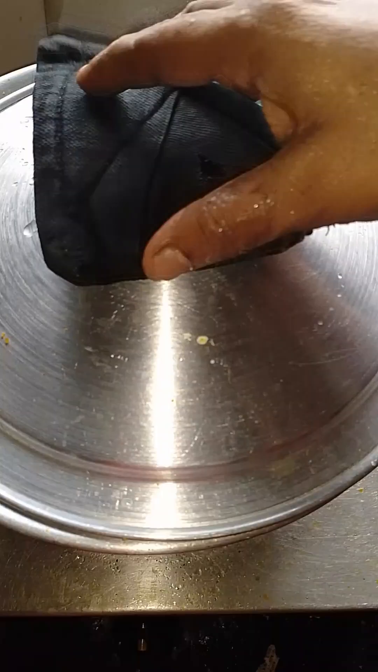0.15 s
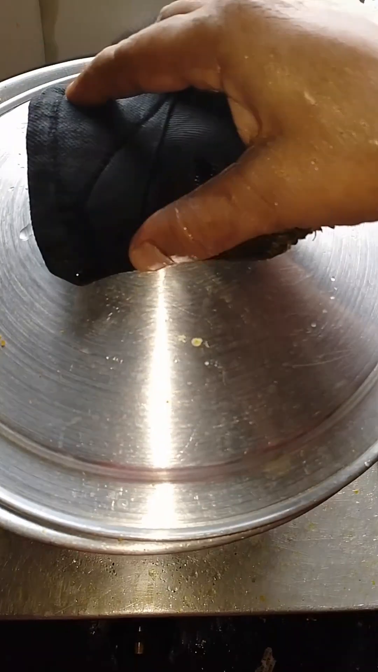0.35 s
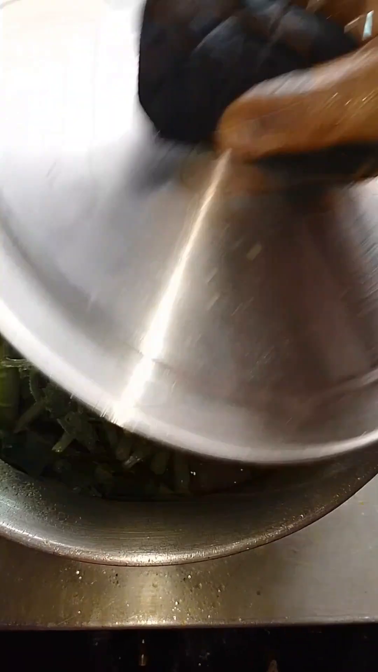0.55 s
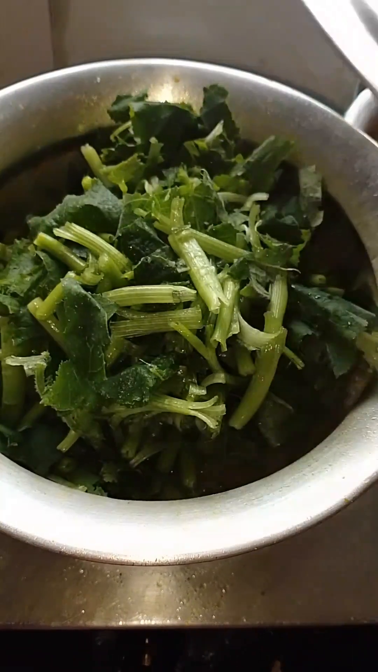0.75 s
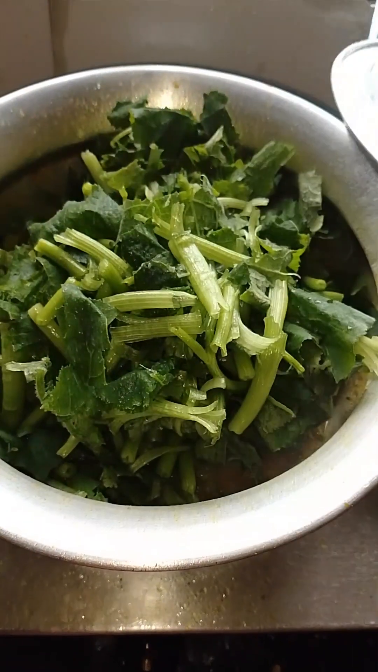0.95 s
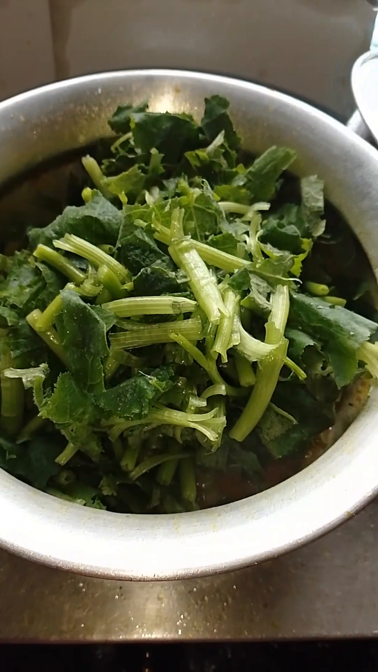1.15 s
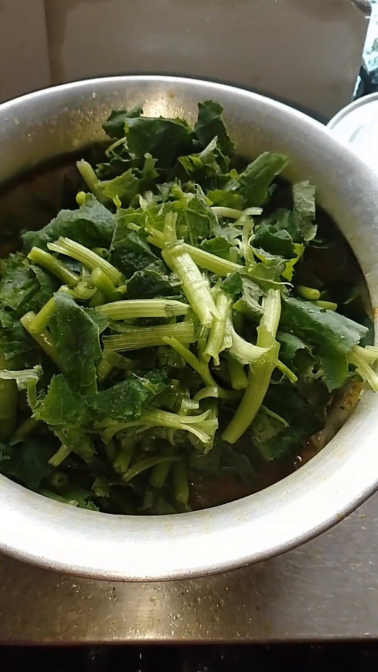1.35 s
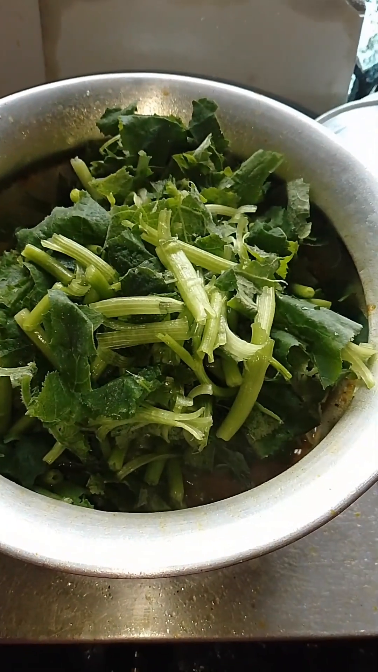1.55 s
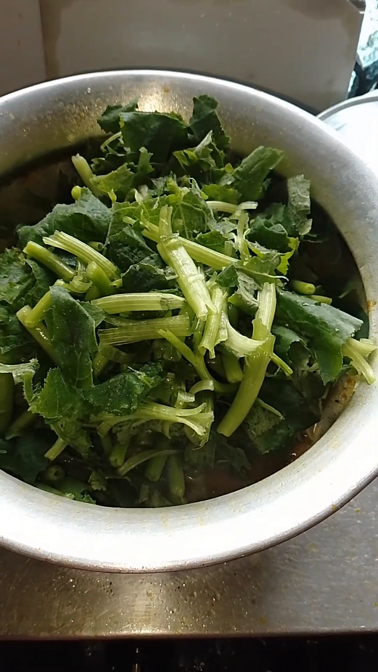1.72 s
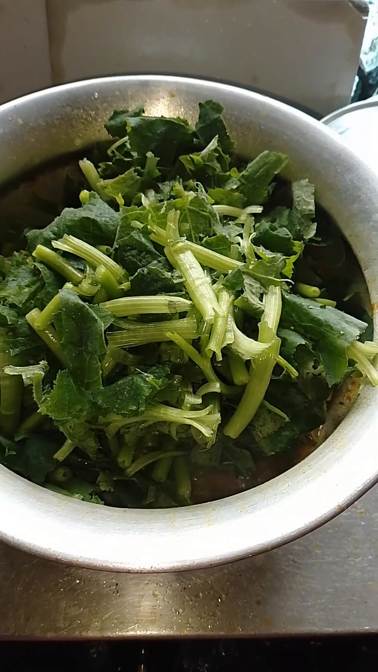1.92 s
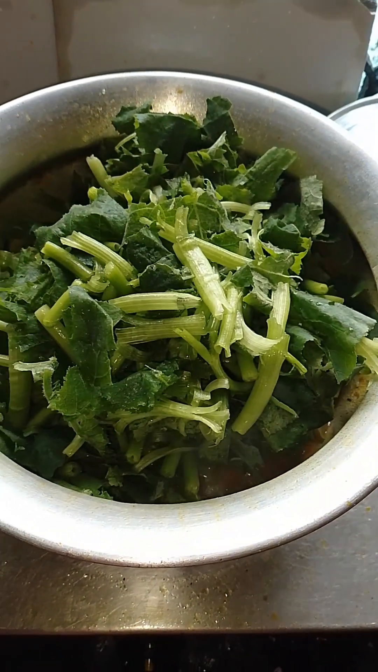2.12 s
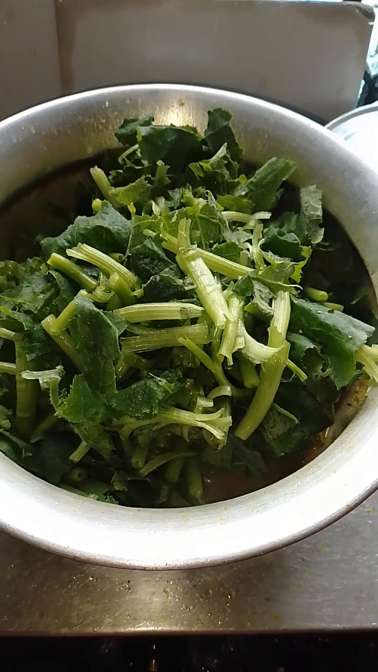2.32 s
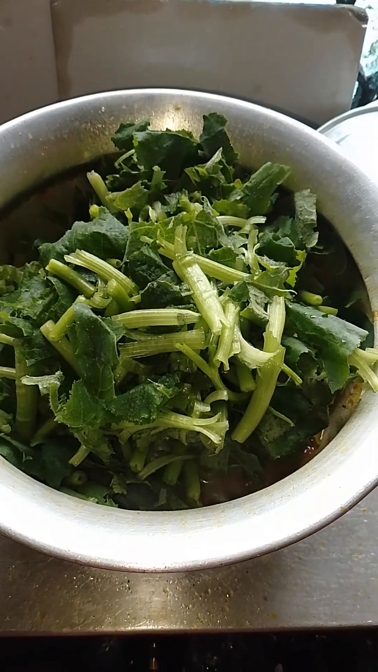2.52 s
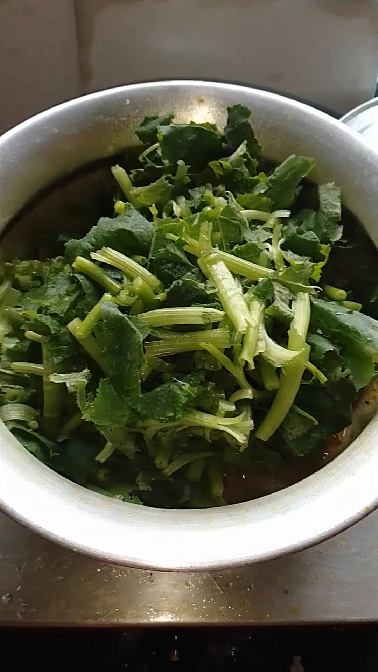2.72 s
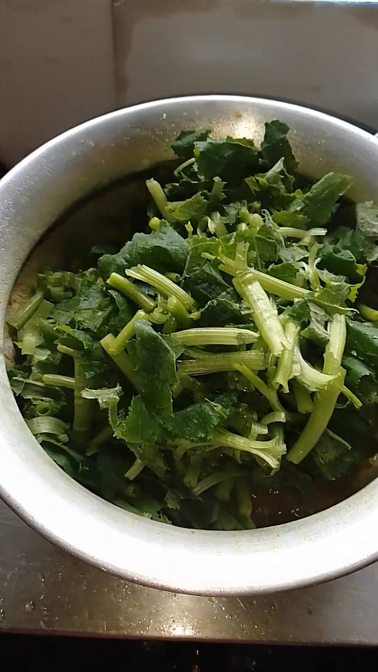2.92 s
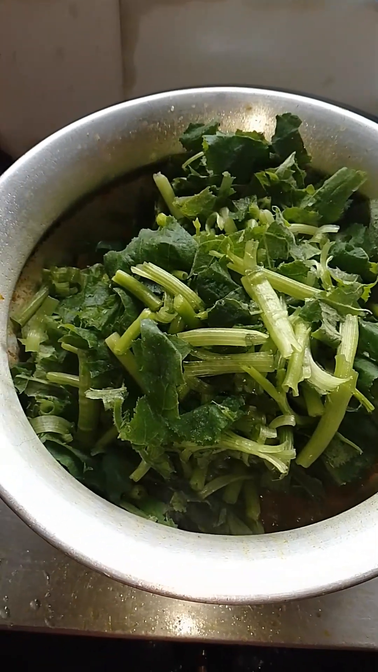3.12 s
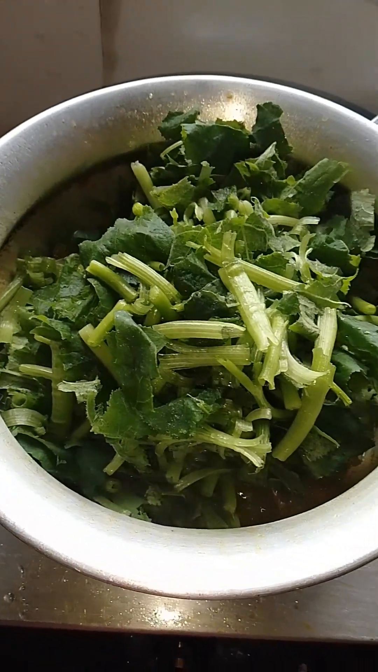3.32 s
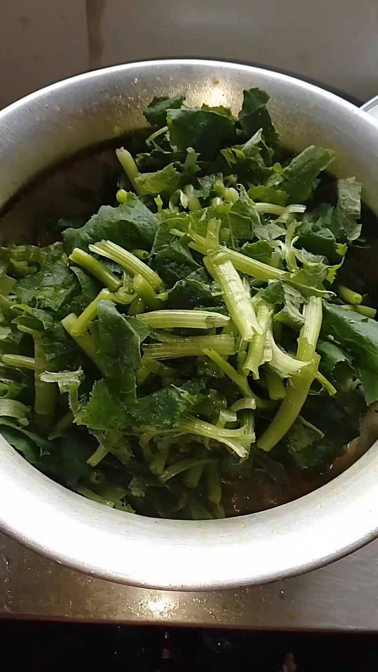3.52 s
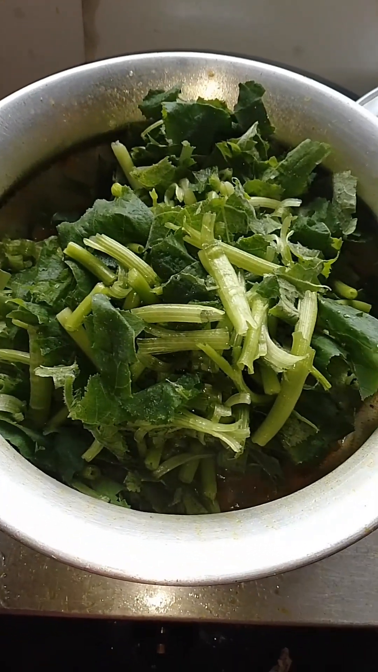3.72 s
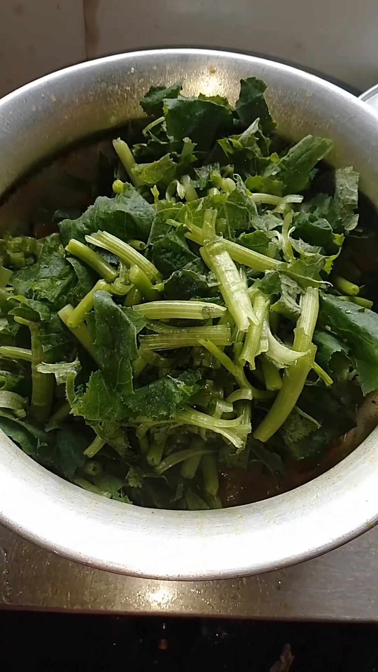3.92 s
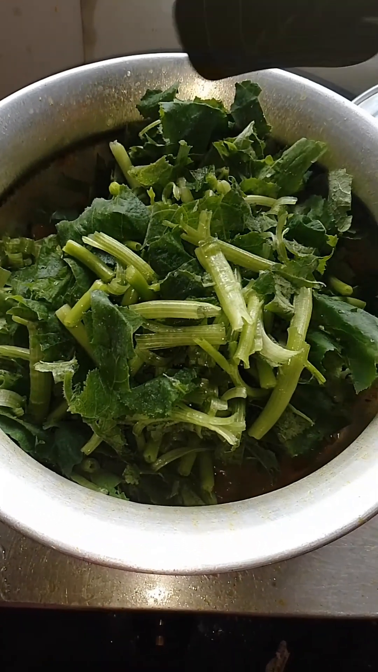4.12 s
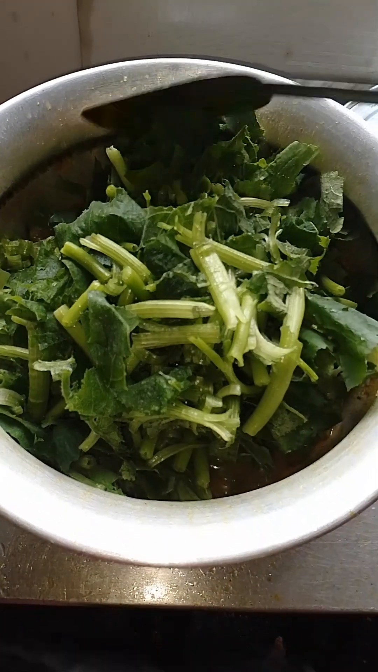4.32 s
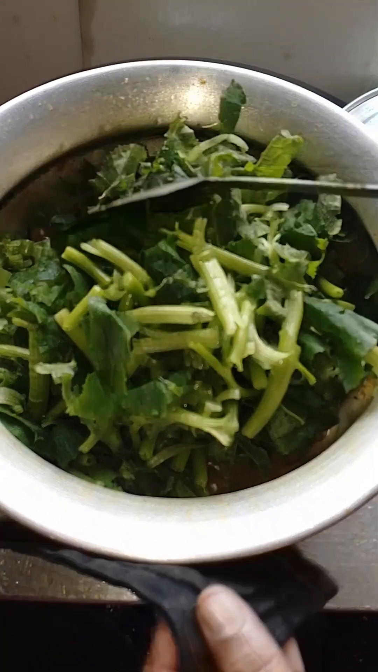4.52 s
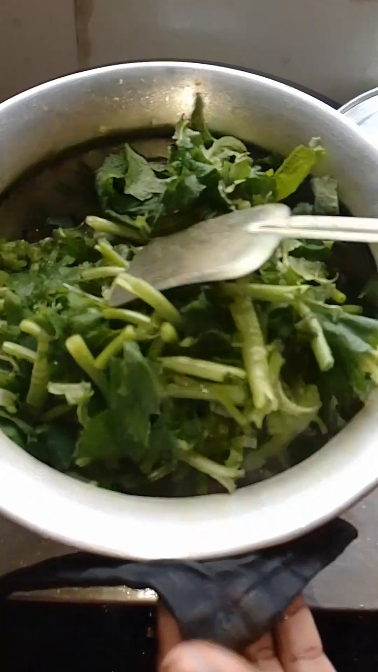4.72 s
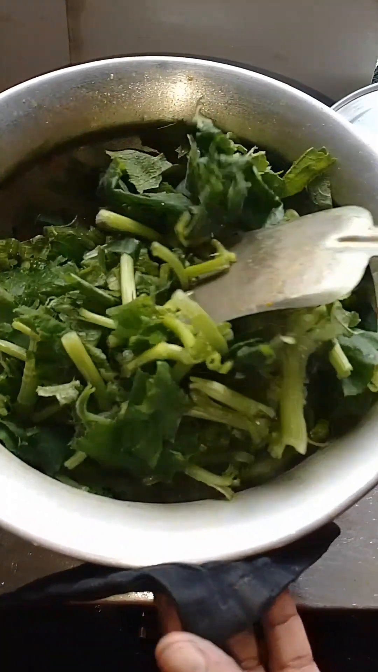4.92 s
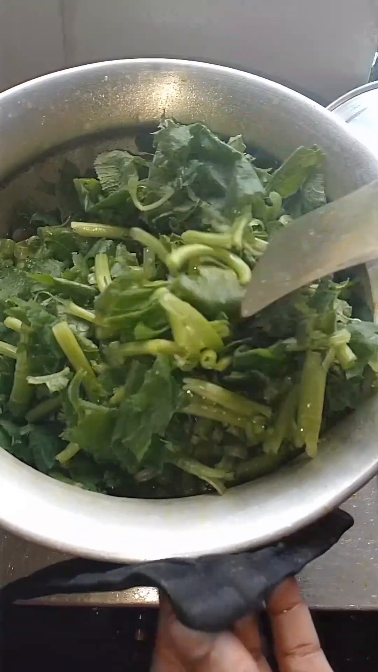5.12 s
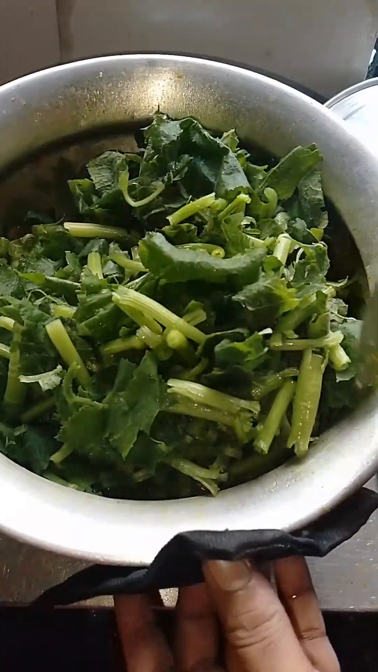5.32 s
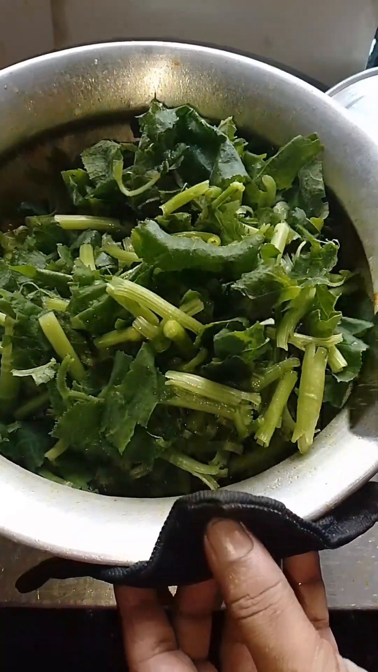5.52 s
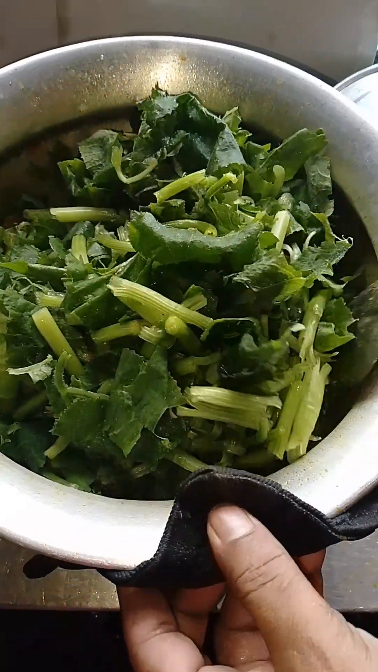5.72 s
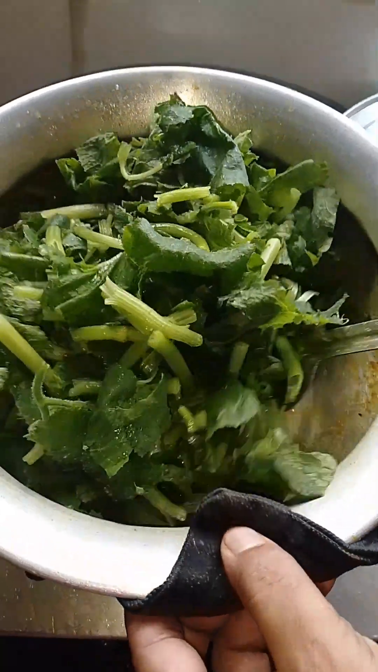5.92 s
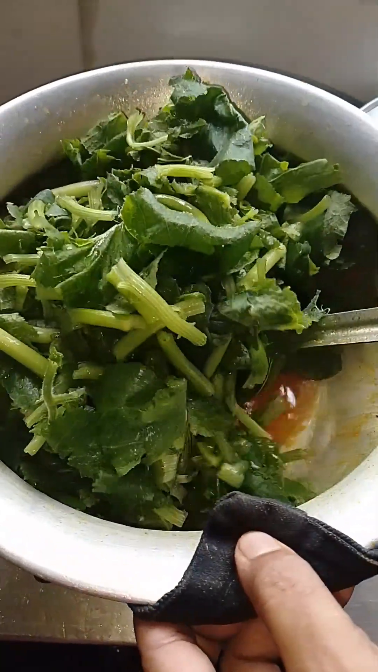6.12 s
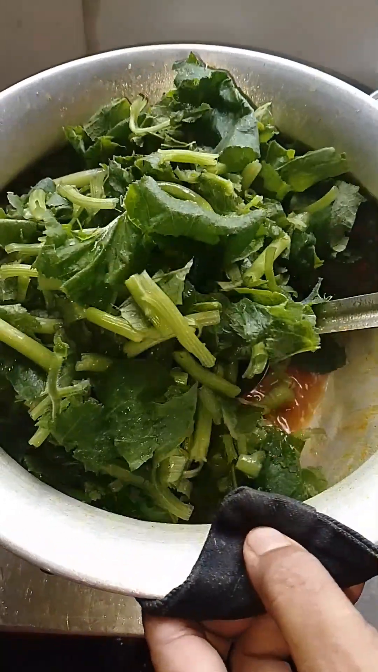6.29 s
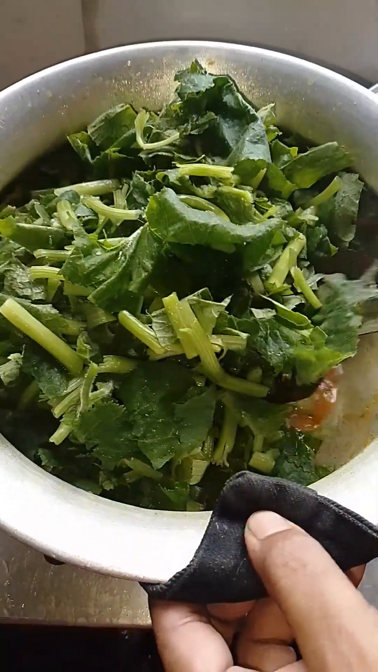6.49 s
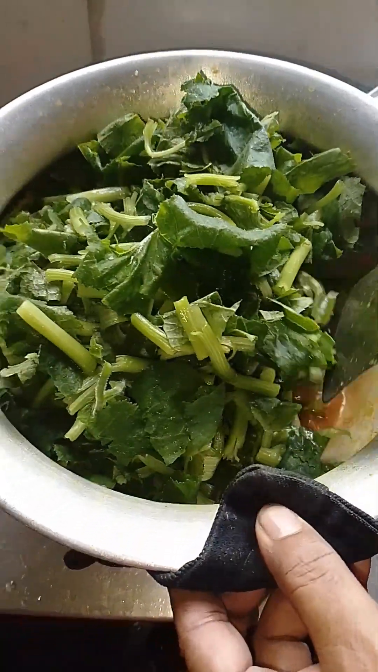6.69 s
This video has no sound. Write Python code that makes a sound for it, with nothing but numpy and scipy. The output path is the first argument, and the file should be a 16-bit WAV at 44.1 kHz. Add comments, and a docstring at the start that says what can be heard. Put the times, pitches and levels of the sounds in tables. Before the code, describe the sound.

A pot of greens simmers softly with small spits while a thin metal lid clatters down, then a spatula taps and scrapes the pot.

```python
"""A scrap of simmer is cut off after 52 ms; after a short silence the simmer of a pot of greens fades in.
Noise bands, ringing bubbles and pot air make the simmer; noise bursts and wavering tones make spits and glugs.
A thin tin lid is put down, knocked and rattles to rest; later a steel spatula taps and scrapes the pot.
Both are banks of decaying modes set off by clicks and rubbing, echoed by a small kitchen.
A low hum lies beneath, and near the end a faint steam whistle sounds."""
import sys
import numpy as np
from scipy import signal
from scipy.io import wavfile

SR = 44100
rng = np.random.default_rng(int(sys.argv[2]) if len(sys.argv) > 2 else 0)


def output_pcm(signal):
    """Save a mono or channel-first signal as 16-bit PCM at the path in sys.argv[1].

    Samples are clipped to [-1, 1] before scaling.
    """
    pcm = np.clip(np.atleast_2d(signal).T, -1, 1) * 32767
    wavfile.write(sys.argv[1], SR, np.round(pcm).astype(np.int16))


N = 297675

# Swing of the simmer, which swells under the stirring and sinks when the greens fall back.
# Each row: time in seconds, relative level in dB.
SIMMER_SWING = [(0, 0.5), (5.66, 0.62), (6.28, 3), (6.34, -3), (6.75, -3)]
# Spectrum of the gurgling broth. Each row: frequency in Hz, relative density in dB per Hz.
GURGLE_SPECTRUM = [(15, -28), (27, 13), (48, 1.5), (80, -4), (172, -5.5), (265, 3.5), (400, 3.5),
                   (635, -3.5), (850, -4), (1030, -2.5), (1220, -7.5), (1410, -3.5), (1750, -37.5),
                   (2900, -54.5)]
# Spectrum of the sizzle. Each row: frequency in Hz, relative density in dB per Hz.
SIZZLE_SPECTRUM = [(900, -22), (1500, -4), (1800, 1.5), (3500, -3), (6500, -2), (9000, -29)]
# Air resonances of the pot, kept humming by the boil.
# Each row: frequency in Hz, mean level in dB, decay time t60 in seconds.
POT_AIR_MODES = [(631, -12, 0.057), (1011, -14.5, 0.069), (1144, -14, 0.019), (1428, -11.5, 0.048)]
# Louder bubbles spitting. Each row: start in seconds, relative level in dB, centre in Hz,
# bandwidth as a fraction of the centre.
LOUD_SPITS = [(0.2976, -37, 6760, 0.24), (0.3206, -42.5, 3700, 0.26), (0.4605, -36.5, 1920, 0.43),
              (0.566, -37, 5970, 0.69), (0.596, -31.5, 3650, 0.4), (0.6587, -40.5, 2500, 0.34),
              (0.7635, -41, 4440, 0.73), (0.8328, -39.5, 1900, 0.61), (0.851, -37.5, 2000, 0.32),
              (1.072, -39, 6240, 0.32), (1.302, -36, 3270, 0.45), (1.35, -34, 3580, 1),
              (1.384, -33.5, 1230, 0.43), (1.4, -39, 6400, 0.12), (1.504, -32.5, 6350, 0.41),
              (1.5654, -42, 5070, 0.64), (1.6067, -32.5, 3570, 1), (2.1132, -38, 5040, 0.57),
              (2.4975, -43.5, 1610, 0.49), (2.596, -38, 5700, 0.26), (2.621, -39.5, 1280, 0.68),
              (3.028, -38, 5050, 0.07), (3.3115, -41, 4420, 0.6), (3.3383, -40, 4840, 0.28),
              (3.485, -41, 2140, 1), (3.649, -41, 5070, 0.25), (3.6986, -35.5, 1370, 0.15),
              (3.8472, -37.5, 4280, 1), (4.0036, -39, 3370, 0.51), (4.1849, -39.5, 1350, 0.61),
              (4.2845, -39.5, 1810, 1), (4.336, -29, 5660, 0.18), (4.404, -34.5, 1950, 0.087),
              (4.6953, -35, 5130, 0.27), (4.779, -36, 5330, 0.61), (5.1803, -36, 6070, 0.16),
              (5.245, -33, 4700, 0.97), (6.0455, -36, 1350, 0.11), (6.564, -35.5, 3000, 0.49),
              (6.603, -42.5, 3320, 0.62), (6.669, -38.5, 2180, 1), (6.678, -38.5, 5000, 1)]
# Low glugs of the broth. Each row: time of the peak in seconds, level in dB before flutter,
# mean pitch in Hz, time from the peak to 1/e in seconds.
GLUG_EVENTS = [(0.637, -36.5, 262.6, 0.03), (0.684, -34.5, 270, 0.01), (0.75, -50, 275, 0.17),
               (0.826, -43, 714, 0.0067), (2.646, -48, 301, 0.065), (4.374, -51, 245, 0.075),
               (6.055, -47.5, 250, 0.033), (6.282, -42.5, 400, 0.017), (6.363, -55.5, 353, 0.34)]
# Lid striking the counter. Each row: time in seconds, relative level in dB,
# place struck from 0 (centre) to 1 (rim).
LID_BLOWS = [(1.1004, -7, 0), (1.104, -11, 0.1), (1.126, -17.5, 0.38), (1.15, -19, 0.12),
             (1.7397, -14.5, 0.73), (1.761, -16.5, 0.9), (1.778, -12.5, 1), (1.791, -12.5, 0.18),
             (1.805, -9.5, 0.58), (1.838, -18, 0.81)]
# Lid edge chattering. The row: start, rise, hold and fall, all in seconds.
LID_CHATTER = (1.772, .033, .04, .02)
# Modes of the lid. Each row: frequency in Hz, relative level in dB struck at the centre,
# the same at the rim, decay time t60 in seconds.
LID_MODES = [(114, -23.5, -52, 0.46), (400, -17, -4, 0.11), (507, -17.5, -2.5, 0.19), (590, -10.5, -1, 0.2),
             (739.4, -21.5, -4, 0.98), (1218, 0, -7, 0.12), (1370, -3.5, -2, 0.085), (1490, -35, -18, 0.12),
             (1950, -13, -35, 0.065), (2510, -15, -35, 0.29), (2733, -20, -11, 0.46),
             (2980, -11, -19, 0.08), (3660, -38, -2, 0.59), (3990, -7, -0.5, 0.057),
             (4270, -21, -20.5, 0.087), (4440, -12, 2.5, 0.097), (4580, -15, -9, 0.083),
             (4770, -19.5, 3, 0.1), (5040, -18.5, -6.5, 0.1), (5230, 5, 7.5, 0.02), (5620, -6, -15, 0.11),
             (5790, -12, 7.5, 0.11), (6095, -0.5, 5.5, 0.044), (6280, -29, -22, 0.25),
             (6375, 0, 10.5, 0.024), (6600, -4, -1, 0.041), (6660, -17, 6, 0.054), (7130, -18, -1, 0.096)]
# Ringing metal comes to rest and is damped until struck again.
# Each row: start in seconds, added loss in dB per second.
METAL_RESTS = [(1.16, 148), (1.89, 495), (5.848, 902)]
# Spatula touching the pot. Each row: time in seconds, relative level in dB,
# place struck from 0 (wall) to 1 (bottom).
SPATULA_TAPS = [(4.4859, -14, 0.1), (5.714, -17.5, 0.43), (5.812, -24, .65), (5.822, -23, 0.45),
                (5.837, -22.5, 1), (6.267, -38.5, 0.94)]
# Spatula sliding in the pot. Each row: start in seconds, hold in seconds, relative level in dB,
# wetness from 0 to 1.
SPATULA_SCRAPES = [(5.719, 0.091, -42.5, 0.4), (5.811, 0.018, -38.5, 0.74), (5.883, 0.076, -48.5, .97),
                   (6.05, 0.037, -46.5, 0.94), (6.17, 0.076, -41.5, 0.95)]
# Modes of pot and spatula. Each row: frequency in Hz, relative level in dB struck at the wall,
# the same at the bottom, decay time t60 in seconds.
POT_MODES = [(795, -29.5, -22, 0.1), (1350, -39, -1, 0.45), (1463, 3, -8, 0.06), (1527, -8, -21, 0.048),
             (1846, -16, -6, 0.135), (2466, -4, -8, 0.052), (2870, -1.5, -9.5, 0.074),
             (2950, -2, -3, 0.076), (3123, -4, 4, 0.037), (3900, -25, -9, 0.11), (4370, -13, -11, 0.089),
             (4780, -9, -3, .07), (5280, -18, -4, 0.027), (5790, 7, 1.5, 0.017), (6600, -19, -9, 0.022),
             (6760, -10, -1, 0.058), (7540, -1, -7, 0.029)]
# Faint steam whistle. The row: start, rise, hold and fall in seconds, level in dB of the sine's peak.
WHISTLE_EVENT = (6.35, .05, .1, .06, -65)

GURGLE_DB, SIZZLE_DB = -52.5, -57  # before the swing of the simmer
HUM_HZ, HUM_DB, WHISTLE_HZ = 118.1, -65, 3890
CHATTER_DB, SCRAPE_RISE_S, SCRAPE_FALL_S = -19.5, 0.0093, 0.02
CONTACT_S = 0.002  # a blow rolls over the metal this long
SECOND_PLACE_CRACK_DB = -2.5  # a blow cracks less at rim or bottom
METAL_LOW_HZ = 70  # the metal sounds carry no deep bass
KITCHEN_T60_S, KITCHEN_DB = 0.2, -7.5
CUT_S, BACK_S, FADE_FROM_S, FADE_IN_S, OPENING_DB = 0.052, 0.208, 0.2, 0.34, 0.5
TREBLE_EDGE_HZ, CUTOFF_HZ, HISS_DB = 7260, 15800, -99


def amp(db):
    """Level to amplitude: 20 dB is a factor of ten."""
    return 10 ** (np.asarray(db) / 20)


def rms_one(x):
    """Normalization of the signal to rms 1."""
    return x / np.sqrt(np.mean(x ** 2) + 1e-20)


def highpass(order, hz, x):
    """Attenuation below a corner frequency by a Butterworth filter."""
    return signal.sosfilt(signal.butter(order, hz, "high", fs=SR, output="sos"), x)


def in_time(rows):
    """Linear interpolation of a two-column table at every sample."""
    return np.interp(np.arange(N) / SR, *np.transpose(rows))


def swell(start, rise, hold, fall):
    """Envelope 0-1 with square-law rise and fall."""
    corners = np.cumsum([start, rise, hold, fall])
    return in_time(list(zip(corners, [0, 1, 1, 0]))) ** 2


def drift(rate):
    """Slow random fluctuation: noise low-passed near the rate in Hz, rms 1, held for 40 samples a step."""
    r = np.exp(-80 * np.pi * rate / SR)
    noise = rng.standard_normal(N // 40 + 2001)
    slow = signal.lfilter([1], [1, -2 * r, r * r], noise)[2000:]
    return np.repeat(rms_one(slow), 40)[:N]


def ring(drive, hz, t60):
    """Damped resonance: a unit click sets off a decaying sine of initial height 1."""
    r, w = amp(-60 / (t60 * SR)), 2 * np.pi * hz / SR
    return signal.lfilter([0, np.sin(w)], [1, -2 * r * np.cos(w), r * r], drive + 1e-18)


def grains(per_s, spread_db):
    """Random impulses of uneven size and sign model irregular contact; rms 1."""
    sizes = amp(spread_db * np.minimum(rng.exponential(1, N), 4))
    signs = rng.choice([-1, 1], N)
    return rms_one(sizes * signs * (rng.random(N) < per_s / SR))


def banded_noise(spectrum, shared_db, own_db, rate):
    """Spectral superposition: quarter-octave noise bands flicker together and alone; rms 1."""
    white = rng.standard_normal((2, N))
    hz, db = np.transpose(spectrum)
    octaves = np.log2(min(hz[-1], 9000) / hz[0])
    edges = hz[0] * 2 ** (np.arange(4 * octaves) / 4)
    out, together = 0, drift(rate)
    for k, (low, high) in enumerate(zip(edges, edges[1:])):
        bandpass = signal.butter(2, [low, high], "band", fs=SR, output="sos")
        band = signal.sosfilt(bandpass, white[k % 2])  # neighbours use different noise
        level_db = np.interp(np.log(low * high) / 2, np.log(hz), db)
        flicker_db = shared_db * together + own_db * drift(rate)
        out = out + band * amp(level_db + flicker_db)
    return rms_one(out)


def bubbling(per_s=60.0, cycles=72.0):
    """Bubble resonance: bubbles rising in the broth ring briefly at low pitches; rms 1."""
    born = grains(per_s, spread_db=3.0)
    dealt = rng.integers(0, 16, N)  # which pitch each bubble takes
    out = np.zeros(N)
    for k, hz in enumerate(np.geomspace(235, 1500, 16)):
        out += ring(born * (dealt == k), hz, cycles / hz) * hz ** -0.2
    return rms_one(out)


def pot_air():
    """Cavity resonance: noise of the boil held in the air of the pot."""
    out = np.zeros(N)
    for hz, db, t60 in POT_AIR_MODES:
        tone = rms_one(ring(rng.standard_normal(N), hz, t60))
        out += amp(db + 2.07 * drift(3.3)) * tone
    return out


def simmer(simmer_db, sizzle_db):
    """Superposition of broth noise, bubbles, pot air and brighter sizzle, all under one swing."""
    gurgle = banded_noise(GURGLE_SPECTRUM, shared_db=1.94, own_db=1.5, rate=14.7)
    broth = gurgle + amp(-8.0) * bubbling() + pot_air()
    sizzle = banded_noise(SIZZLE_SPECTRUM, shared_db=1.4, own_db=0.66, rate=53.0)
    return amp(GURGLE_DB + simmer_db) * broth + amp(sizzle_db) * sizzle


def low_hum():
    """Narrow-band noise: a sharp resonance driven by noise gives an uneven low hum."""
    return amp(HUM_DB) * rms_one(ring(rng.standard_normal(N), HUM_HZ, t60=0.43))


def spit(level_db, hz, width, noise, t60=0.11):
    """Bubble burst: a bright tick, then a puff of noise around one pitch, dying fast."""
    t = np.arange(len(noise)) / SR
    r = np.exp(-np.pi * hz * width / SR)
    poles = [1, -2 * r * np.cos(2 * np.pi * hz / SR), r * r]
    puff = rms_one(signal.sosfilt([[1, 0, -1, *poles]] * 2, noise))
    puff = puff * amp(-60 * t / t60) * np.minimum(t / 0.00037, 1)
    tick = amp(4.5) * np.diff(noise, prepend=0) * np.exp(-t / 0.0018)
    return (puff + tick) * amp(level_db - 7.0)


def spitting(sizzle_db, small_per_s=31.0, over_db=5):
    """Poisson process: many small random bursts follow the sizzle among the loud ones."""
    size = SR // 8
    out, draws = np.zeros(N + size), rng.random((330, 4))
    times = np.cumsum(-np.log(draws[:, 0])) / small_per_s
    bursts = list(LOUD_SPITS)
    for s, (_, b, c, d) in zip(times, draws):
        if s < N / SR:
            level_db = sizzle_db[int(s * SR)] + over_db + 8 * b
            bursts.append((s, level_db, 1100 * 6.72 ** np.sqrt(c), 0.1 + 0.68 * d))
    for s, *shape in bursts:
        out[round(s * SR):][:size] += spit(*shape, rng.standard_normal(size))
    return out[:N]


def glugs():
    """Frequency and amplitude modulation: large steam pockets swell and fade on one wavering pitch."""
    t = np.arange(N) / SR
    waver = np.cumsum(1 + 0.01344 * drift(15.8)) / SR  # warped time in seconds
    out, flutter = np.zeros(N), amp(2.7 * drift(32.0))
    for s, peak_db, hz, length in GLUG_EVENTS:
        near = slice(max(round((s - 3 * length) * SR), 0), round((s + 3 * length) * SR))
        envelope = np.exp(-((t[near] - s) / length) ** 2)
        out[near] += amp(peak_db) * envelope * np.sin(2 * np.pi * hz * waver[near])
    return out * flutter


def struck(modes, blows, rub, ring_db, crack_db, crack_t60, crack_hz, buzz_db):
    """Modal excitation: the place struck weights each mode, rubbing acts at the second, loose contact buzzes."""
    s, db, place = np.transpose(blows)
    at = (s * SR).round().astype(int)
    out, buzz = np.zeros(N), amp(buzz_db * drift(120.0))
    live = slice(at.min() - 99, at.max() + SR // 2)
    for k, (hz, first_db, second_db, t60) in enumerate(modes):
        lags = (rng.random(len(at)) * CONTACT_S * SR).astype(int)
        mode_db = first_db + place * (second_db - first_db) + rng.standard_normal(len(at))
        clicks = np.zeros(N)
        clicks[at + lags] = amp(db + ring_db + mode_db) * rng.choice([-1, 1], len(at))
        drive = clicks[live] + rub[live] * amp(second_db) / np.sqrt(t60 * SR)
        mode_buzz = np.roll(buzz, 4000 * k)[live] ** min(0.15 / t60, 1)  # long rings buzz less
        out[live] += ring(drive, hz, t60) * mode_buzz
    clicks = np.zeros(N)
    clicks[at] = amp(db + crack_db + place * SECOND_PLACE_CRACK_DB)
    dying = signal.lfilter([1], [1, -amp(-60 / (crack_t60 * SR))], clicks + 1e-18)
    return out + dying * highpass(3, crack_hz, rng.standard_normal(N))


def lid():
    """Plate vibration: blows ring the thin tin, dense chatter rubs its rim as it settles."""
    chatter = amp(CHATTER_DB) * swell(*LID_CHATTER) * grains(3000, spread_db=1.5)
    ringing = struck(LID_MODES, LID_BLOWS, amp(-4.0) * chatter, ring_db=-12.5,
                     crack_db=-10.5, crack_t60=0.11, crack_hz=300, buzz_db=3.5)
    return amp(-1) * highpass(2, 300, chatter) + ringing


def damping():
    """Added damping: a gain sinking steadily in dB from each rest until just before the next blow."""
    t, db = np.arange(N) / SR, np.zeros(N)
    blows = np.array([b[0] for b in list(LID_BLOWS) + list(SPATULA_TAPS)] + [N / SR])
    for s, loss_db_per_s in METAL_RESTS:
        until = blows[blows > s].min() - 0.002
        db -= loss_db_per_s * (t - s) * (t > s) * (t < until)
    return amp(db)


def kitchen(x):
    """Diffuse reverberation: convolution with decaying noise, as in a small hard room."""
    t = np.arange(SR // 2) / SR
    tail = rng.standard_normal(len(t)) * amp(-60 * t / KITCHEN_T60_S) * (t > 0.003)
    return amp(KITCHEN_DB) * signal.fftconvolve(x, tail / np.sqrt(np.sum(tail ** 2)))[:N]


def spatula():
    """Friction and impact: dry sliding rings the pot, wet sliding through the greens only rustles."""
    rub, rustle, contact = 0, 0, grains(1500, spread_db=1.5)
    for start, length, db, wet in SPATULA_SCRAPES:
        stroke = amp(db) * swell(start, SCRAPE_RISE_S, length, SCRAPE_FALL_S) * contact
        rub = rub + (1 - wet) * stroke
        rustle = rustle + wet * stroke
    rustle = signal.sosfilt(signal.butter(1, [500, 7000], "band", fs=SR, output="sos"), rustle)
    ringing = struck(POT_MODES, SPATULA_TAPS, amp(10.0) * rub, ring_db=-15.0,
                     crack_db=-10.5, crack_t60=0.061, crack_hz=1260, buzz_db=5.0)
    return rustle, ringing


def steam_whistle():
    """Frequency modulation: a faint sine whose pitch wavers slightly."""
    *envelope, db = WHISTLE_EVENT
    waver = np.cumsum(1 + 0.00223 * drift(20.0)) / SR
    return amp(db) * swell(*envelope) * np.sin(2 * np.pi * WHISTLE_HZ * waver)


def scene():
    """Superposition of the simmer and the metal, the latter with its room echo."""
    simmer_db = in_time(SIMMER_SWING)
    sizzle_db = SIZZLE_DB + simmer_db
    boil = simmer(simmer_db, sizzle_db) + spitting(sizzle_db) + glugs()
    rustle, pot_ringing = spatula()
    metal = highpass(2, METAL_LOW_HZ, (lid() + pot_ringing) * damping() + rustle)
    return (boil + low_hum() + metal + kitchen(metal) + steam_whistle())[None]


def record(dry):
    """Gain and band limiting: cut and fade in, steep treble roll-off, the faintest hiss, a final cutoff."""
    t = np.arange(N) / SR
    fade_in = np.clip((t - FADE_FROM_S) / FADE_IN_S, 0, 1) * (t > BACK_S)
    fader = np.where(t < CUT_S, amp(OPENING_DB), fade_in)
    roll_off = signal.cheby1(10, 0.5, TREBLE_EDGE_HZ, fs=SR, output="sos")
    dull = signal.sosfilt(roll_off, dry * fader)
    hiss = amp(HISS_DB) * rng.standard_normal(dry.shape)
    cutoff = signal.cheby2(10, 30, CUTOFF_HZ, fs=SR, output="sos")
    return signal.sosfilt(cutoff, dull + hiss)


dry = scene()
out = record(dry)
output_pcm(out)
```